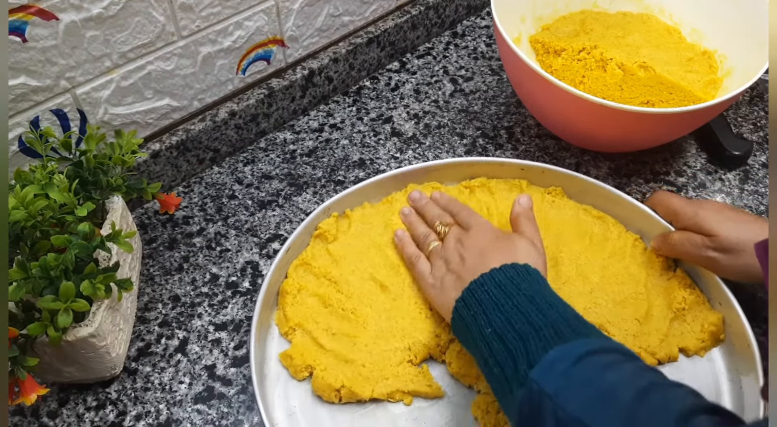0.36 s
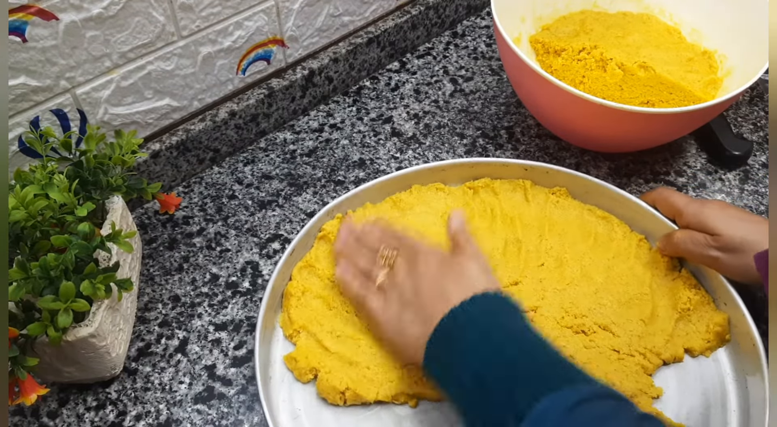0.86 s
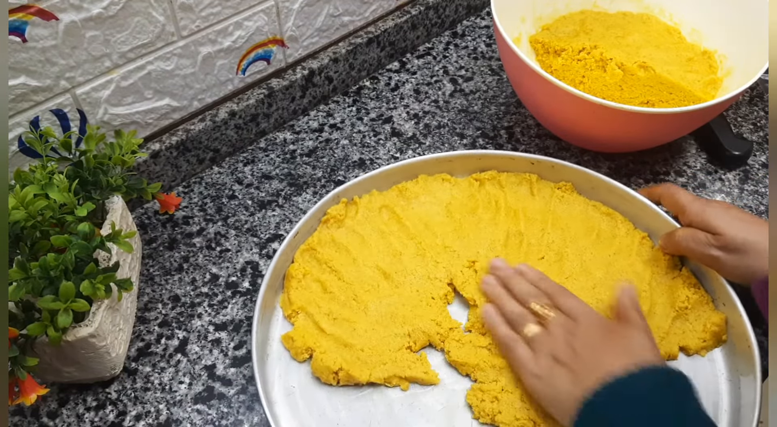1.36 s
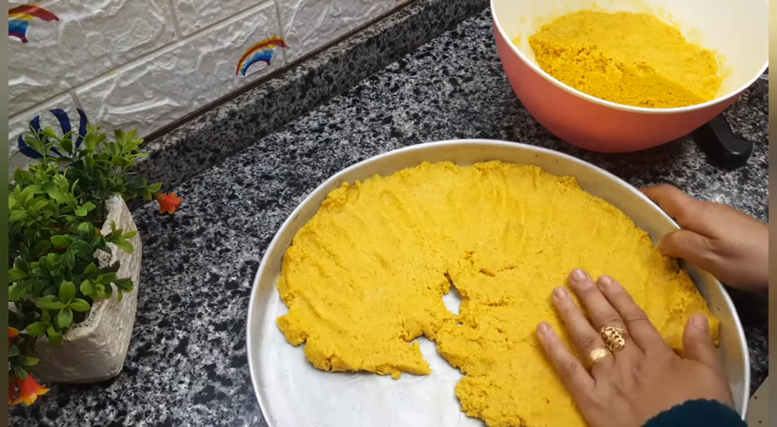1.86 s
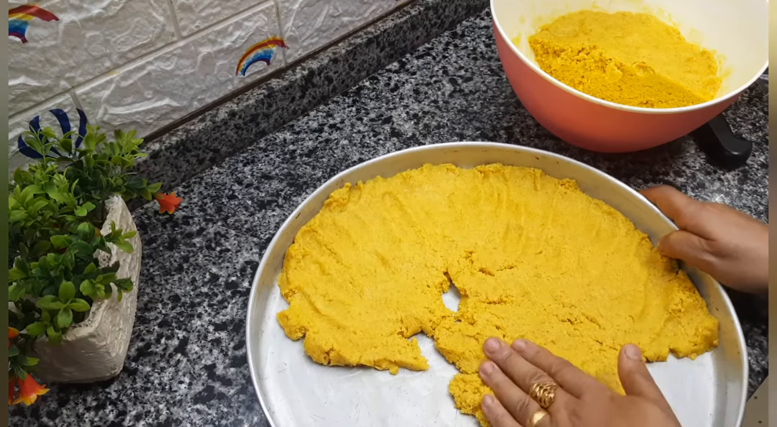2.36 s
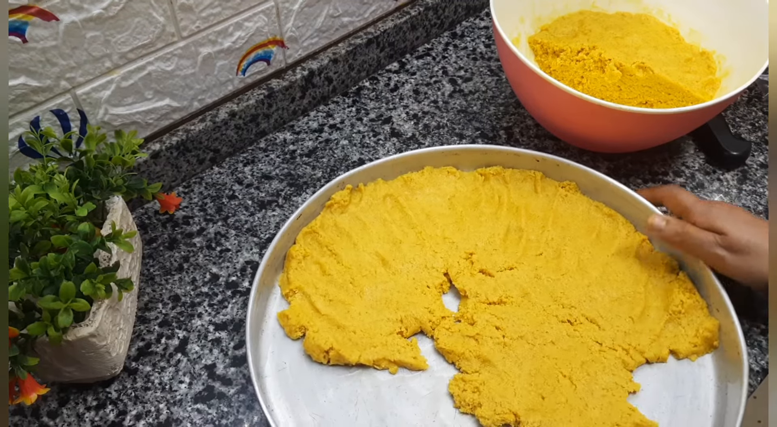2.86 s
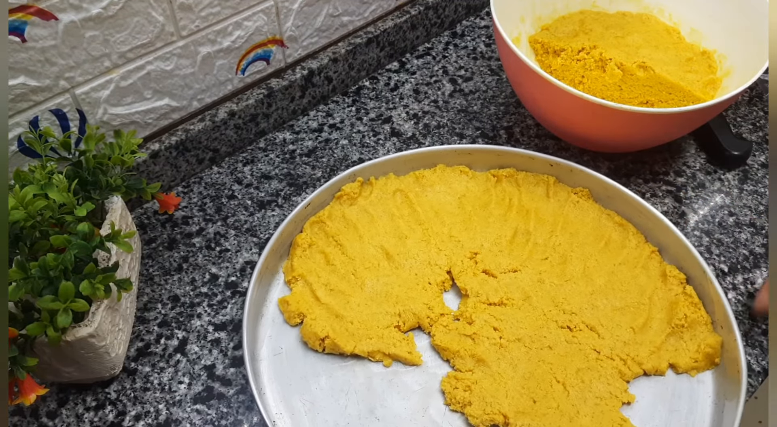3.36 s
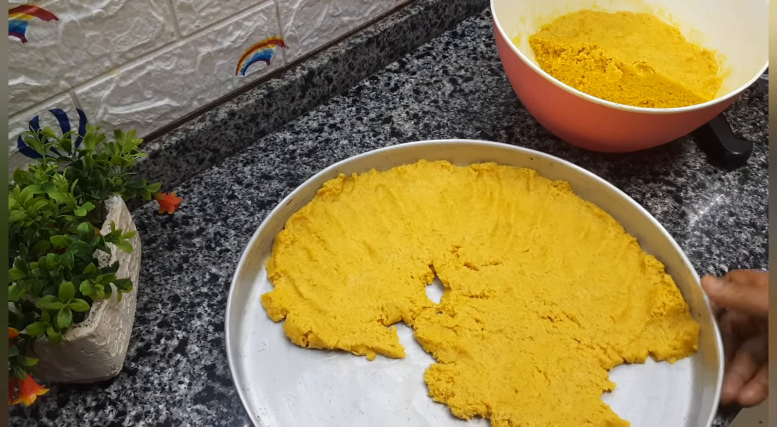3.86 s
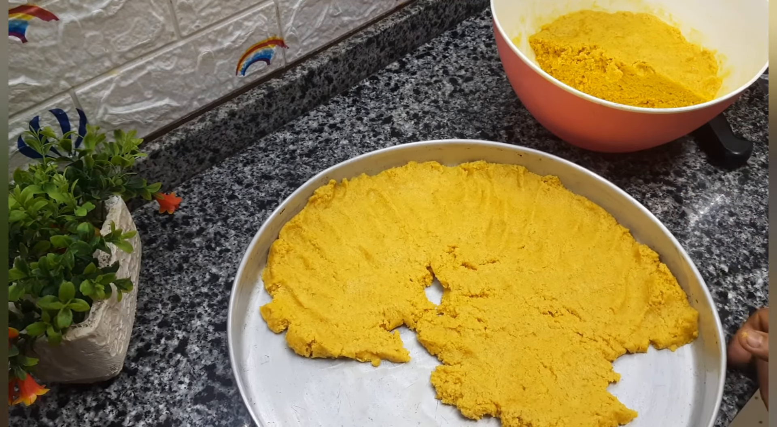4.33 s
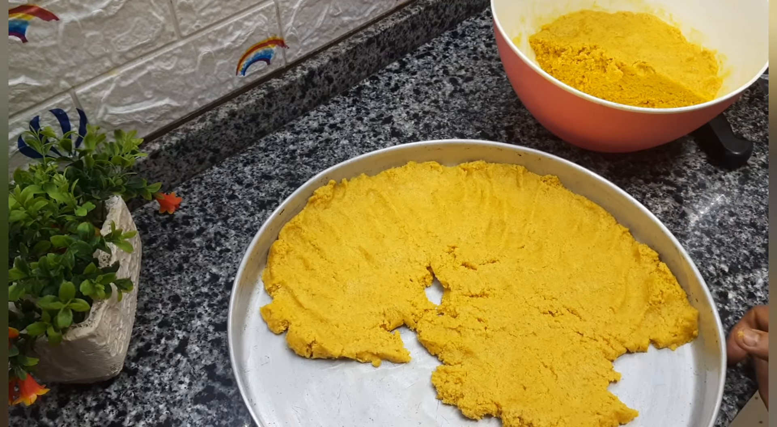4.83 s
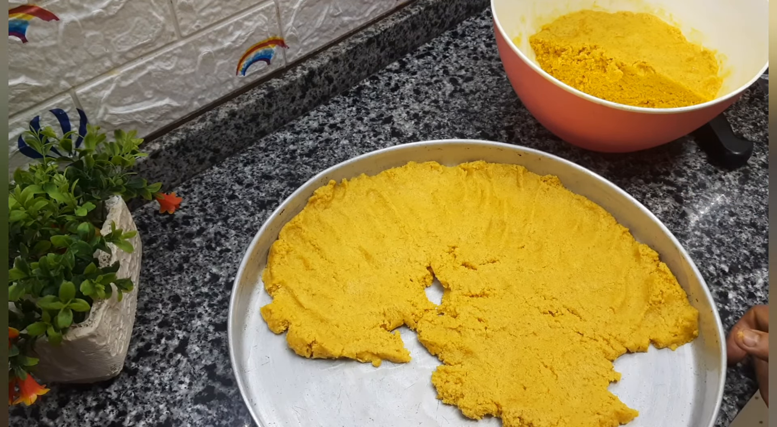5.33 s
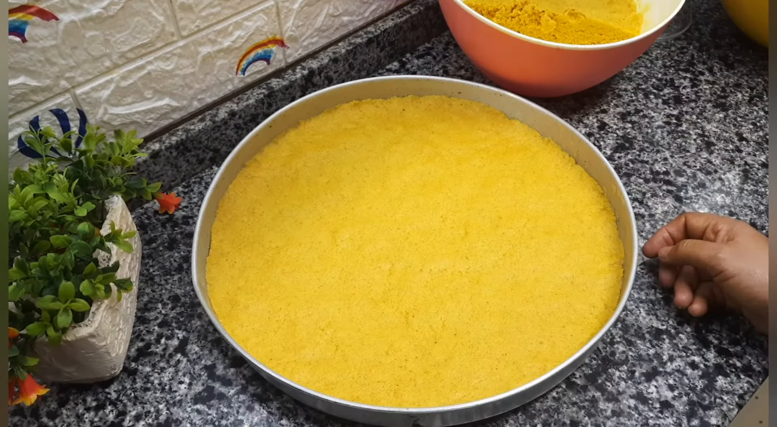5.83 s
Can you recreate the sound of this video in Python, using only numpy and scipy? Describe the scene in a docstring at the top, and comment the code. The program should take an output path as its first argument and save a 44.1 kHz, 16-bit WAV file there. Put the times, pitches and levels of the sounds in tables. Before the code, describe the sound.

A palm presses dough in a metal tray whose rim knocks hard and irregularly on a stone counter, then quiet with a faint low hum.

```python
"""Dough pressed in a rocking metal tray

A palm presses dough in a round tray whose rim knocks on a stone counter in a small tiled kitchen.
Each knock is a pressure dip ringing rim and tray modes plus a noisy crack, with reverb and a bass thud.
Grainy noise makes palm and fingers, resonant noise makes creaks and groans.
Two hum tones waver over a dull noise wash; wash and microphone hiss drop at once near the end."""
import sys
import numpy as np
from scipy import signal
from scipy.io import wavfile
from scipy.ndimage import uniform_filter1d

SR = 44100
rng = np.random.default_rng(int(sys.argv[2]) if len(sys.argv) > 2 else 0)


def undo_db(level):
    """Turn decibels back into plain size, where 20 dB means ten times bigger."""
    steps = np.asarray(level, float) / 20
    return 10 ** steps


def store_pcm(level_fs):
    """Save levels as 16-bit WAV."""
    pcm = np.round(np.clip(level_fs, -1, 1) * 32767).astype(np.int16)
    wavfile.write(sys.argv[1], SR, np.atleast_2d(pcm).T)


N = 273346

# Low modes of counter and room: f/Hz, relative level/dB, t60/s
BOOM_MODES = [(69.62, 2, 0.11), (85, -2.5, 0.34), (105, 1, .25), (128.3, 0, 0.15), (146.5, -5.5, 0.44),
              (169, -9, .25), (208, -11.5, 0.23), (219.4, -12, 0.17)]


def evened(x):
    """Scales to rms 1."""
    return x / np.sqrt(np.mean(x ** 2) + 1e-20)


def read(points, hz):
    """Interpolates a spectrum on a log-frequency axis."""
    f, value = np.transpose(points)
    return np.interp(np.log(hz + 1), np.log(f + 1), value)


def curve(rows, column=1):
    """Interpolates one table column over the whole time."""
    rows = np.array(rows)
    return np.interp(np.arange(N) / SR, rows[:, 0], rows[:, column])


def noise(points, size=1024, patchy_db=0., length=N):
    """Two-channel noise with a given spectrum, drifting patches and likeness between ports."""
    # Port likeness: f/Hz, left-right correlation
    likeness = [(50, .99), (150, .98), (300, .9), (500, .55), (900, .3), (3000, .1)]
    frames, hz = 4 * length // size + 5, np.fft.rfftfreq(size, 1 / SR)
    a, b, c, d, patches = rng.standard_normal((frames, len(hz), 5)).T
    patches = uniform_filter1d(patches, size=8, axis=0)
    patches = evened(uniform_filter1d(patches, size=10, axis=1))
    same = np.clip(read(likeness, hz), -1, 1)[:, None]
    left = a + 1j * b
    right = same * left + np.sqrt(1 - same ** 2) * (c + 1j * d)
    spectrum = np.array([left, right]) * undo_db(read(points, hz)[:, None] + patchy_db * patches)
    sound = signal.istft(spectrum, nperseg=size, noverlap=3 * size // 4)[1]
    return evened(sound[:, :length])


def resonate(x, hz, width_hz):
    """A resonance of gain 1 that follows hz: shift to 0 Hz, one-pole low-pass, shift back."""
    turn = np.exp(2j * np.pi * np.cumsum(hz * np.ones(N)) / SR)
    r = np.exp(-np.pi * width_hz / SR)
    return 2 * (turn * signal.lfilter([1 - r], [1, -r], x / turn)).real


def resonate_twice(x, hz, width_hz):
    """Two equal resonances in series, for steeper skirts."""
    return resonate(resonate(x, hz, width_hz), hz, width_hz)


def ring(modes, t):
    """Sum of exponentially dying sines with random phases."""
    hz, db, t60 = np.transpose(modes)[:, :, None]
    phase_turns = rng.random((len(modes), 1))
    return (undo_db(db - 60 * t / t60) * np.sin(2 * np.pi * (hz * t + phase_turns))).sum(0)


def swell(top_s, length_s, db):
    """Gain of one stroke: builds up to its loudest moment, then lets go at about the same pace."""
    rise_share, power = 0.48, 1.1
    t = np.arange(N) / SR - top_s
    u = np.where(t < 0, -t / rise_share, t / (1 - rise_share)) / length_s
    return undo_db(db) * np.cos(np.pi / 2 * np.minimum(u, 1)).clip(0) ** power


def gated(strokes):
    """Gain from separate strokes, silent between them."""
    return sum(swell(*row) for row in strokes)


def background_gain():
    """Gain of the background noise, which drops at once."""
    drop_s, drop_db = 5.76, -2.5
    return undo_db(drop_db * (np.arange(N) / SR > drop_s))


def hum(hz, fuzz, width_hz):
    """A tone of slightly unsteady level with a little narrow noise around it."""
    waver_db = 0.03  # rms
    tone = np.sqrt(2) * np.sin(2 * np.pi * np.cumsum(hz * np.ones(N)) / SR)
    waver = uniform_filter1d(rng.standard_normal(N), size=2000)
    waver = evened(uniform_filter1d(waver, size=2000))
    haze = evened(resonate_twice(rng.standard_normal(N), hz, width_hz))
    return undo_db(waver_db * waver) * (tone + fuzz * haze)


def rumble():
    """Two wavering hum tones with a duller noise wash around them."""
    # Hum before panning: t/s, lower tone level/dB, upper tone level/dB
    hum_levels = [(0, -55, -57), (2.7, -61.5, -66.5), (3.3, -59, -56.5), (4.2, -60, -64.5),
                  (4.62, -61, -54), (5.0, -57.5, -56), (5.17, -61, -66), (5.3, -57, -52), (5.62, -53, -52),
                  (5.71, -62, -74), (6.2, -58.5, -70.5)]
    # Upper tone pitch: t/s, f/Hz
    upper_pitch = [(0, 103.9), (4.4, 108), (6.2, 109.3)]
    # Wash spectrum: f/Hz, relative density/dB
    wash_spectrum = [(18, -29), (30, -5), (54, -24), (76, -20.5), (108, -17.5), (184, -26.5), (238, -20.5),
                     (287, -25.5), (447, -32), (491, -33), (579, -43.5), (2500, -55), (3250, -92),
                     (5500, -120)]
    lower = undo_db(curve(hum_levels)) * hum(49., fuzz=0.36, width_hz=5.9)
    upper = undo_db(curve(hum_levels, column=2)) * hum(curve(upper_pitch), fuzz=0.8, width_hz=19.0)
    wash = undo_db(-63) * background_gain() * noise(wash_spectrum, size=2048, patchy_db=2.5)
    return (lower + upper) * undo_db([[.6], [-.6]]) + wash


def creak():
    """Faint creaks and squeaks: friction noise in narrow resonances."""
    # Creaks: loudest t/s, length/s, level/dB, f/Hz
    creaks = [(2.917, 0.1, -63.5, 507), (2.956, 0.21, -68.5, 676), (3.155, 0.15, -65, 672),
              (3.212, 0.22, -63.5, 439), (3.687, 0.23, -77, 1060), (4.72, .1, -82.5, 2248),
              (4.895, .1, -80, 2063), (4.908, 0.12, -81, 1550)]
    drive = rng.standard_normal((2, N))
    return sum(swell(s, length_s, db) * evened(resonate_twice(drive, hz, 90.))
               for s, length_s, db, hz in creaks)


def lean():
    """Palm leaning on the tray: a low groan of noise through the counter and room modes."""
    # Leaning strokes: loudest t/s, length/s, level/dB
    leans = [(.354, 0.11, -52.5), (.475, 0.057, -42.5), (.68, 0.16, -43.5), (1.2, 0.056, -51.5),
             (1.57, 0.19, -44), (1.7, 0.21, -49.5), (2.27, 0.4, -48.5)]
    drive = rng.standard_normal(N)
    groan = sum(undo_db(db) * resonate(resonate(drive, hz, 2.1), hz, 26.0) for hz, db, _ in BOOM_MODES)
    return gated(leans) * evened(groan)


def rustle(pressure, colour):
    """Skin dragging over a surface: hiss roughened by small grains."""
    grains = undo_db(1.8 * rng.exponential(1, N // 64 + 1)).repeat(64)[:N]
    grains = uniform_filter1d(grains, size=64)
    return pressure * evened(noise(colour, size=256, patchy_db=2.5) * grains)


def fingers():
    """Fingers along the rim: separate strokes of rustle."""
    # Finger strokes: loudest t/s, length/s, level/dB
    finger_strokes = [(2.95, 0.21, -69), (3.74, 0.29, -71.5), (4.9, 0.26, -82), (5.66, 0.22, -83)]
    # Skin-on-rim spectrum: f/Hz, relative density/dB
    skin_spectrum = [(410, -24), (700, -12), (854, -19), (1050, 0.5), (1700, -19), (2050, -9),
                     (2800, -10.5), (3300, -17.5), (7460, -18.5), (14500, -55), (16500, -44)]
    return rustle(gated(finger_strokes), skin_spectrum)


def palm():
    """Palm strokes over dough, above a faint steady contact that ends in a short fade."""
    # Palm strokes: loudest t/s, length/s, level/dB
    palm_strokes = [(.42, .2, -58), (.8, 0.14, -59), (1.2, .17, -63), (1.54, 0.09, -71), (1.69, 0.15, -57),
                    (2.34, 0.49, -73)]
    # Palm-on-dough spectrum: f/Hz, relative density/dB
    palm_spectrum = [(410, -33), (700, -4), (1080, 2), (2020, -11.5), (2490, -5.5), (3750, -10.5),
                     (7560, -4.5), (9470, -18), (15000, -2.5), (15900, -10), (16500, -27)]
    rest_end_s, rest_db = 2.75, -71.5
    rest = undo_db(rest_db) * np.clip((rest_end_s - np.arange(N) / SR) * 10, 0, 1)
    return rustle(gated(palm_strokes) + rest, palm_spectrum)


def reverb(length):
    """Dense reflections, each band dying at its own speed, near mono in the bass."""
    # Room decay: f/Hz, t60/s
    room_decay = [(150, 0.19), (420, 0.27), (1100, 0.29), (2900, 0.32), (7700, 0.2), (15000, 0.15)]
    # Reverb spectrum: f/Hz, relative density/dB
    room_colour = [(150, 2), (270, 0), (400, 8), (650, 1.5), (900, -1.5), (1300, -7.5), (1900, -7.5),
                   (2800, 0.5), (4500, -2.5), (7000, -2), (10000, -0.5), (15000, 4)]
    hz, t, z = signal.stft(noise(room_colour, size=1024, length=length), SR, nperseg=256)
    z = z * undo_db(-60 * t / read(room_decay, hz)[:, None])
    tail = signal.istft(z, SR, nperseg=256)[1][:, :length]
    tail = tail * np.clip(np.arange(length) / SR / 0.002, 0, 1)  # builds up over the first bounces
    return tail / np.linalg.norm(tail[0])


def spot(rim_modes, touch, t):
    """One contact point: ring of the rim, a lighter first touch, and the paths to both ports."""
    # Wall and counter echoes: delay/s, left/dB, right/dB
    echoes = [(.0043, -17, -19.5), (.0087, -18, -21.5), (.013, -17.5, -21.5)]
    body = np.zeros((2, 8192))
    body[:, 0] = .7  # the blow itself
    for hz, left_db, right_db, t60 in rim_modes:
        decay = undo_db(-60 * t[:8192] / t60) * np.cos(2 * np.pi * hz * t[:8192])
        body += undo_db([[left_db], [right_db]]) * decay / 10
    late = undo_db(-2.0) * reverb(len(t))
    for delay_s, left_db, right_db in echoes:
        late[:, round(delay_s * SR)] += undo_db([left_db, right_db])
    lead_s, touch_db = touch
    contacts = np.zeros(128)
    contacts[127] = 1
    contacts[127 - round(lead_s * SR)] = -undo_db(touch_db)  # opposite sign
    return body, late, contacts


def tray(t):
    """Ring of the dough-laden tray; each blow shares its energy differently among the modes."""
    # Tray modes: f/Hz, relative level/dB, t60/s
    tray_modes = [(338.2, -1.5, 0.11), (395, -5.5, 0.21), (429, -2.5, 0.059), (531, 0, 0.054),
                  (636.2, 2, 0.093), (718, -7.5, 0.048), (920, -6.5, 0.016), (924, -5.5, 0.07),
                  (978, -3.5, 0.017), (1083, -4.5, 0.06), (1295.3, -9, 0.035), (1307.5, -4, 0.032),
                  (1464, -14.5, .05), (1626, -19, 0.05), (1740, -20, .05), (1880, -16.5, .04)]
    spread_db = 1.03
    modes = np.array(tray_modes)
    modes[:, 1] += spread_db * rng.standard_normal(len(modes))
    return undo_db(-28.5) * ring(modes, t) * (1 - np.exp(-t / 0.0022))


def crack_shape(db):
    """Minimum-phase click with the colour of metal on stone; harder blows are brighter."""
    # Crack spectrum before brightening: f/Hz, relative level/dB
    crack_spectrum = [(880, 6), (1500, -31.5), (3350, -10), (5360, -12.5), (6490, -17), (7320, -12),
                      (9130, -25.5), (10300, -23.5), (15400, -25), (16500, -45.5)]
    brighter_per_db = 0.24  # dB per octave above 4 kHz, per dB of blow
    hz = abs(np.fft.fftfreq(2048, 1 / SR))
    colour_db = read([(200, -71.5)] + crack_spectrum, hz)
    colour_db = colour_db + brighter_per_db * db * np.log2(np.maximum(hz / 4000, 1))
    log_spectrum = np.conj(signal.hilbert(np.log(undo_db(colour_db) + 1e-5)))
    click = np.fft.ifft(np.exp(log_spectrum)).real[:512]
    return click / abs(click).max()


def thud(t):
    """Bass after a blow: counter and room modes plus diffuse noise, swelling in over about 20 ms."""
    # Diffuse thud spectrum: f/Hz, relative density/dB
    thud_spectrum = [(40, -12.5), (90, -2), (160, 0), (240, -7.5), (330, -8.5), (450, -24.5), (700, -70.5)]
    bass = undo_db([[.7], [-.7]]) * ring(BOOM_MODES, t)
    bass += undo_db(-5.5 - 60 * t / 0.27) * noise(thud_spectrum, size=2048, length=len(t))
    return bass * (1 - np.exp(-(t / .02) ** 2))


def knocks():
    """A short pressure dip rings rim and tray, a crack rides on it; both fill the room; bass follows."""
    # Rim on stone: t/s, level/dB, direct left-right/dB, thud re blow/dB, crack re blow/dB
    blows = [(0.0243, -5.5, 1.5, -16.5, -0.5), (0.0988, -6, -0.5, -19.5, -0.5), (0.112, -18, 6, -17, -5),
             (0.4418, -42, 11.5, -9, 2.5), (0.4977, -43, -4, -19.5, -6.5),
             (0.5106, -5.5, -6.5, -16.5, -7.5), (0.539, -11, -2.5, -27.5, -2.5),
             (0.8744, -21.5, -2, -15, -3), (0.9133, -24, 2.5, -36, -9), (0.9357, -29, -7, -11.5, -6.5),
             (0.989, -38.5, 2, -33.5, -5.5), (1.2713, -27, 2, -18, -5.5), (1.318, -32.5, 0, -11, -5),
             (1.3555, -40.5, 1, -31, -10), (1.5406, -37, 6.5, -15.5, -6), (1.7145, -7.5, -5, -16, -0.5),
             (1.7322, -15.5, 4.5, -19, -1.5), (1.8081, -18.5, 1, -14.5, -1.5),
             (1.8686, -25, -0.5, -9, -1.5), (1.9098, -7, 3, -12, 1), (1.9223, -21.5, 1.5, -23, -9.5),
             (1.9385, -11, 5.5, -11, 1), (1.9972, -16.5, 8.5, -10, 1), (2.1092, -5, -1.5, -25, 0.5),
             (2.1314, -14.5, 11.5, -10.5, -3.5), (2.456, -11, -0.5, -16.5, 1.5),
             (2.5749, -21, -5.5, -15, -1), (2.6919, -29, -4, -13, -4), (2.8011, -51, -7, -8, -2),
             (3.7683, -22.5, -1, -15, -4.5), (3.856, -26, -10, -14.5, -4.5)]
    # Rim ring at near and far contact: f/Hz, relative left/dB, relative right/dB, t60/s
    rim_rings = [
        [(1040, -4, -1, 0.012), (1247, -7.5, -9.5, 0.0058)],
        [(1360, 4.5, 3.5, 0.017), (810, -9, -10, 0.027)],
    ]
    # Lighter contact before the blow, near and far: lead/s, level re blow/dB
    first_touches = [(.0004, -20), (.0015, -4)]
    far_from_s, far_until_s = 1.89, 2.05  # the tray tips the other way
    blow_ms, rebound_ms, rebound_within_s = 0.12, 0.11, .025  # half widths; gap of a quick rebound
    crack_room_db = -1.5  # crack sent into the room, re direct crack
    onset = 160  # samples from segment start to the blow
    length = SR * 3 // 5
    out, t = np.zeros((2, N + length)), np.arange(length) / SR
    spots = [spot(modes, touch, t) for modes, touch in zip(rim_rings, first_touches)]
    gaps_s = np.diff(np.array(blows)[:, 0], prepend=-1)
    for (s, db, pan_db, thud_db, crack_db), gap_s in zip(blows, gaps_s):
        body, late, contacts = spots[int(far_from_s < s < far_until_s)]
        half_width_ms = rebound_ms if gap_s < rebound_within_s else blow_ms
        u = (np.arange(64) - 32) / SR * 1000 / half_width_ms
        dip = np.convolve((u ** 2 - 1) * np.exp(-u ** 2 / 2), contacts)
        ringing = signal.fftconvolve(body + tray(t[:8192]), dip[None], axes=1)

        click = crack_shape(db)
        grit_shape = signal.windows.exponential(256, onset, .0005 * SR, sym=False)
        grit = rng.standard_normal((2, 256)) * grit_shape
        grit = grit / np.linalg.norm(grit, axis=1, keepdims=True)
        direct, sent = ringing.copy(), ringing.copy()
        direct[:, :767] += undo_db(crack_db) * signal.fftconvolve(grit, click[None], axes=1)
        sent[:, onset:onset + 512] += undo_db(crack_db + crack_room_db) * click

        paths = late + undo_db(1.5) * reverb(length)  # no two blows land quite alike
        sound = signal.fftconvolve(paths, sent, axes=1)[:, :length]
        sound[:, :direct.shape[1]] += undo_db([[pan_db / 2], [-pan_db / 2]]) * direct
        sound += undo_db(thud_db) * thud(t)
        at = round(s * SR) - onset
        out[:, at:at + length] += undo_db(db) * sound
    return out[:, :N]


def scene():
    """All sources in the kitchen."""
    return rumble() + creak() + lean() + fingers() + palm() + knocks()


def band_limit(x):
    """A steep low-pass at the top of the band."""
    return signal.sosfilt(signal.butter(12, 17000, fs=SR, output="sos"), x)


def record(dry):
    """Two ports a little apart (the right one lags), a bass cut, microphone hiss and overload."""
    # Microphone hiss spectrum: f/Hz, relative density/dB
    hiss_spectrum = [(350, -37.5), (600, -5), (1250, -5), (1580, -9.5), (2060, -15.5), (2650, -11.5),
                     (4120, -15.5), (15000, -15.5), (16500, -14.5)]
    lead_s, bass_cut_hz, hiss_db = .00014, 36., -82
    lag = round(lead_s * SR)
    x = np.array([dry[0], np.pad(dry[1], (lag, 0))[:N]])
    x = signal.sosfilt(signal.butter(4, bass_cut_hz, "high", fs=SR, output="sos"), x)
    x = x + undo_db(hiss_db) * background_gain() * noise(hiss_spectrum, size=1024)
    mix = np.clip(x, -.97, .97)
    return band_limit(mix)


dry = scene()
out = record(dry)
store_pcm(out)
```